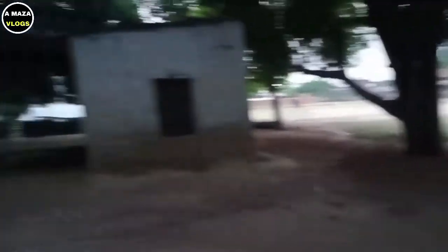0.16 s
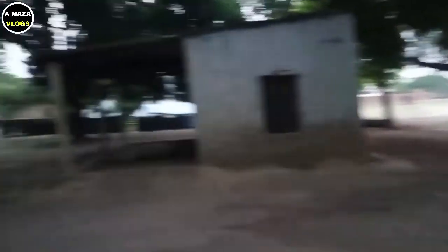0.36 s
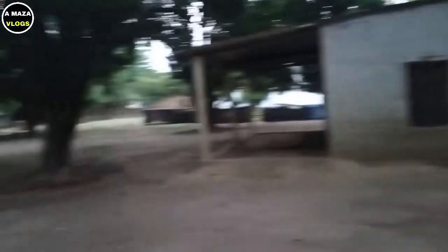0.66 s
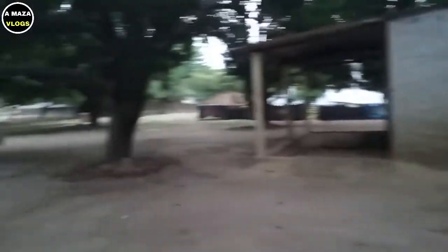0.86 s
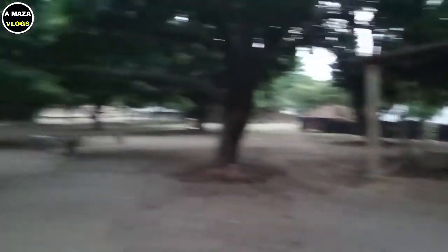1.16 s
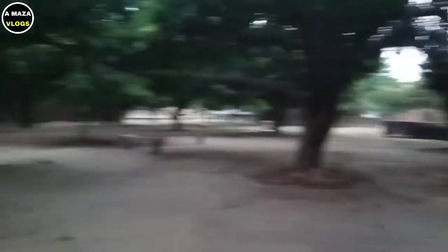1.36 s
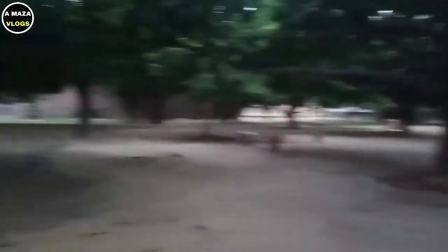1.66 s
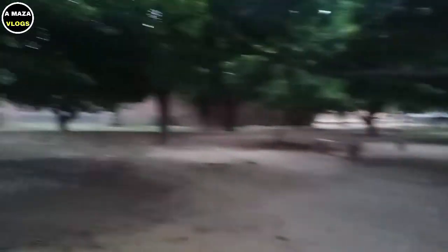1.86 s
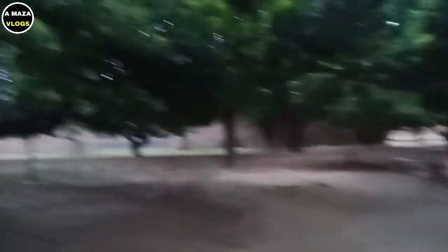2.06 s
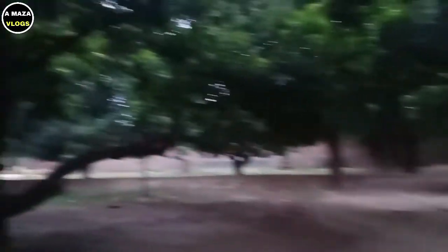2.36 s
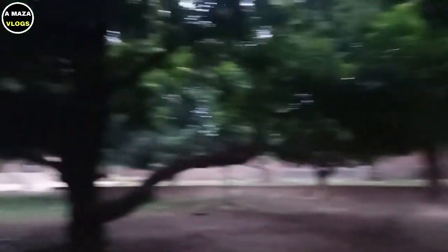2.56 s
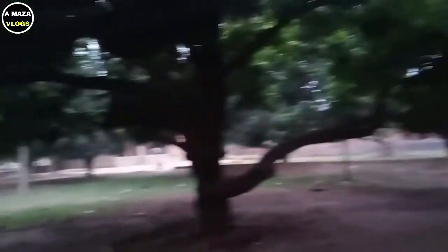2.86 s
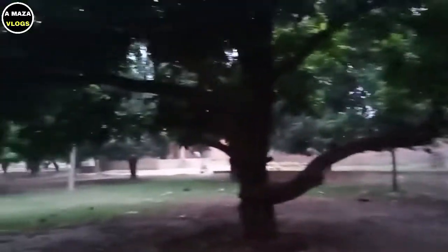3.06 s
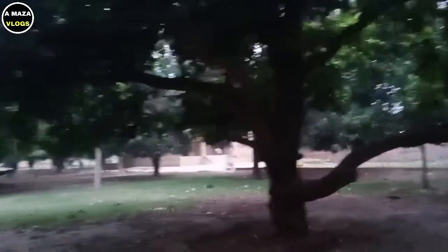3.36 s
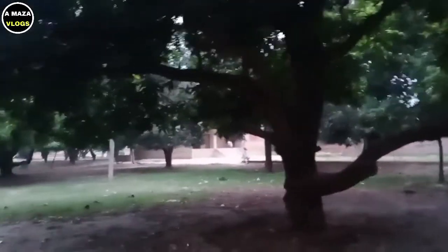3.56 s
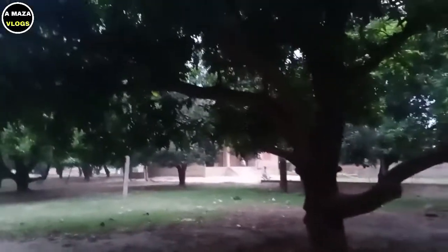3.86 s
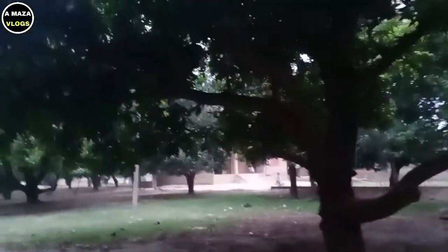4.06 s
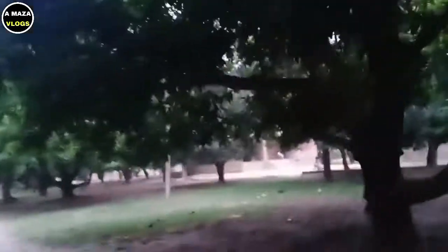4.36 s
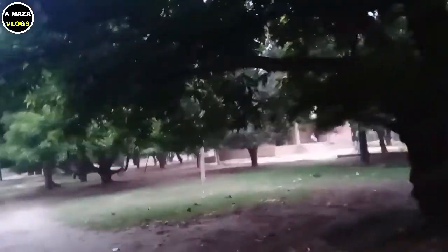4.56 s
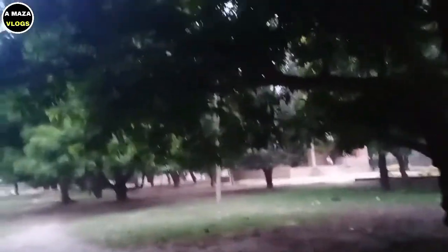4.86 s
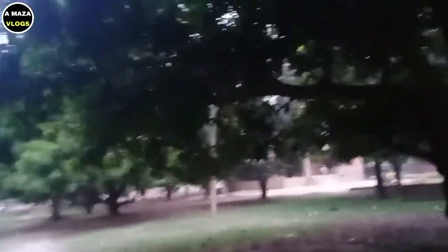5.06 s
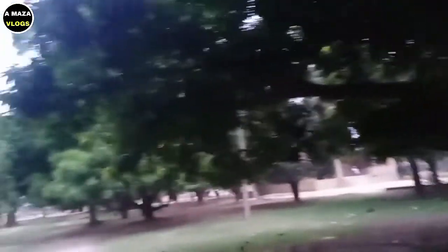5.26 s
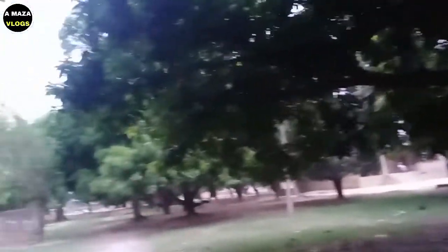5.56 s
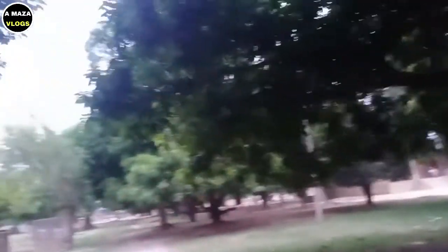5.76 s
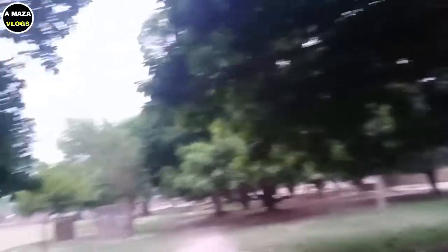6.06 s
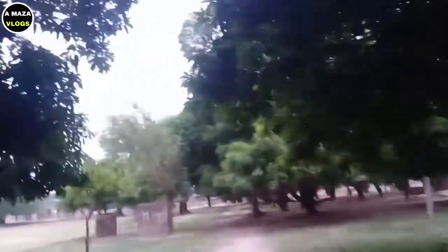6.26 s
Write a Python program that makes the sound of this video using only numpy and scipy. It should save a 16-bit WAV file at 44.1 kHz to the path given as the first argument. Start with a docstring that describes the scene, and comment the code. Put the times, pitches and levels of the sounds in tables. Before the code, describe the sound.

Cicadas keep up a high, steady drone in an orchard. One close by swells into a throbbing buzz, then slowly fades. A songbird repeats a falling note among small chirps and tiny pips, and distant calls blur into a chorus, lightly echoed by the trees. Someone scuffs over dry ground, with one loud crunch past the middle and a couple of twig snaps. Two swooping whistles come near the end.

```python
"""A steady drone of cicadas fills an orchard at dawn; one close to the microphone swells up in throbbing
syllables and fades. Their buckling ribs click, and their hollow bodies ring. In the trees a songbird
repeats a falling slur among other birds' chirps; nearer by come tiny pips and two swooping whistles,
and far calls blur into a chorus, all echoed by trunks and crowns. Someone walks over dry ground:
a few scuffs of the soles, one loud crunch and two snapping twigs."""
import sys
import numpy as np
from scipy import signal
from scipy.fft import rfft, irfft
from scipy.io import wavfile

SR = 44100
rng = np.random.default_rng(int(sys.argv[2]) if len(sys.argv) > 2 else 0)


def master_out(mix):
    """Clip the mix to full scale and print it as 16-bit PCM to the path in sys.argv[1]."""
    frames = np.transpose(np.atleast_2d(mix))
    ceiling = np.clip(frames, -1, 1)
    pcm = np.round(ceiling * 32767).astype(np.int16)
    wavfile.write(sys.argv[1], SR, pcm)


N = 282681
TIME = np.arange(N) / SR


def close_cicada():
    """Close to the microphone, an abdomen pumps clicks into syllables; overtones sound between beats."""
    # the swell and fade: (time [s], song level [dB], overtone level [dB])
    levels = [(0, -43.5, -60), (1.05, -53.5, -57), (1.35, -40.5, -50.5), (1.75, -36, -39),
              (2.0, -30.5, -41.5), (2.35, -29, -41.5), (2.7, -34, -52.5), (3.2, -37.5, -53),
              (4.3, -43.5, -57), (4.7, -50, -61), (5.35, -43.5, -66), (6.41, -64, -64)]
    # colour of the song: (frequency [Hz], relative level [dB])
    body = [(5600, -49.5), (6250, -11.5), (6700, -15.5), (7300, 5.5), (7500, 2), (7700, -8.5), (8100, -1),
            (8550, -8.5), (9250, -20), (9850, -22.5), (11300, -39.5)]
    # colour of the thin hiss above it: (frequency [Hz], relative level [dB])
    overtones = [(10000, -60), (11400, 3.5), (12200, -29), (13400, 8), (15300, 11)]
    song_db, hiss_db = in_time(levels)
    syllable_hz = 26.8
    turns = syllable_hz * TIME + .35
    opening = .36 + ((1 + np.cos(2 * np.pi * turns)) / 2) ** .38
    clicks = tymbal(click_hz=418, jitter=.03, uneven_db=2.1)
    ringing = shell(coloured(clicks * opening, body))
    song = rms_one(orchard(ringing, wet_db=-8, t60=.17))
    # lower and upper overtones peak at different moments of the syllable
    rasp = coloured(clicks + .92 * rng.standard_normal(N), overtones)
    low = band(rasp, 12600, spread=1.06) * from_db(3 + 6 * np.cos(2 * np.pi * (turns - .5)))
    high = rasp * from_db(2.2 * np.cos(2 * np.pi * (turns - .72)))
    return from_db(song_db) * song + from_db(hiss_db) * rms_one(low + high)


def cicada_drone():
    """Three cicadas further off, each at its own click rate and smeared by the trees on its own path."""
    # colour of the drone: (frequency [Hz], relative level [dB])
    colour = [(5200, -42.5), (5750, -26), (6000, -11.5), (6300, -14), (6850, 1), (7100, 1.5), (7350, -2),
              (7700, -1), (8250, -6), (8550, -9.5), (9300, -23), (11400, -38), (12500, -45), (15300, -53)]
    voices = [tymbal(click_hz=385, jitter=.13, uneven_db=2.5),
              from_db(-2.5) * tymbal(click_hz=440, jitter=.15, uneven_db=1.3),
              from_db(-3) * tymbal(click_hz=310, jitter=.18, uneven_db=.82)]
    blurred = sum(orchard(clicks, wet_db=0, t60=.08) for clicks in voices)
    return from_db(-38) * rms_one(shell(coloured(blurred, colour)))


def tymbal(click_hz, jitter, uneven_db):
    """A cicada's ribs buckle in a fast, slightly uneven train of clicks."""
    turns = np.cumsum(click_hz * (1 + jitter * drift(250))) / SR
    clicks = np.diff(np.floor(turns), prepend=0)
    return rms_one(clicks * from_db(uneven_db * rng.standard_normal(N)))


def shell(x):
    """A cicada's hollow body rings on at a few pitches."""
    # sharp resonances: (frequency [Hz], width [Hz], gain [dB])
    modes = [(6550, 140, -14), (7780, 51, 7.5), (8850, 95, -22)]
    return x + sum(from_db(db) * signal.lfilter(*signal.iirpeak(hz, hz / width, fs=SR), x)
                   for hz, width, db in modes)


def footsteps():
    """Soles scuff dry ground and each crack is a burst of tiny fractures; thin twigs also spit treble."""
    # soles rubbing: (time [s], length [s], level [dB], centre [Hz], band edge over centre [ratio])
    scuffs = [(.74, 0.1, -50.5, 3500, 1.25), (1.213, 0.043, -35.5, 3510, 1.21),
              (1.79, 0.14, -53.5, 4470, 1.25), (2.15, 0.052, -42.5, 3350, 1.34),
              (2.99, 0.22, -47, 3700, 1.7), (3.874, 0.13, -31.5, 1790, 2), (3.982, 0.07, -30, 2000, 1.9),
              (4.22, 0.16, -49, 1810, 1.95), (5.05, 0.16, -50.5, 2480, 1.5), (6.357, .028, -33, 4630, 1.7)]
    # twigs and clods breaking underfoot: (time [s], level [dB], centre [Hz])
    cracks = [(2.1939, -27, 2360), (3.878, -15.5, 1470), (3.896, -16.5, 1250), (3.918, -14.5, 1780),
              (3.9215, -8.5, 2100), (3.93, -17, 2670), (3.9368, -11.5, 2300), (3.948, -15, 2700),
              (3.995, -23, 1600), (4.0148, -13.5, 3840), (4.039, -12, 2720), (4.301, -30, 3700),
              (4.3264, -18.5, 2430), (5.04, -26, 2420), (5.0515, -12.5, 2380), (6.363, -30, 4900),
              (6.373, -19, 4640)]
    # colour the ground gives to both: (frequency [Hz], relative level [dB])
    ground = [(200, -17), (400, 2.5), (600, -7), (850, -4), (1500, 1), (3300, -4), (5200, 2), (7000, -7.5),
              (10500, -4), (14500, 6.5)]
    steps = rubbing(scuffs, grain_db=1, clump_db=3.5, sheen_db=-10.5)
    t, decay_s = TIME[:SR // 10], .0016
    for s, db, hz in cracks:
        fractures = rng.standard_normal(len(t)) * np.exp(-t / decay_s)
        treble_gain = from_db(-21.5) * (hz / 3000) ** 2
        crack = band(fractures, hz, spread=1.55) + treble_gain * band(fractures, 13300, spread=1.43)
        add(steps, s, from_db(db) * crack / np.abs(crack).max())
    return from_db(.5) * orchard(coloured(steps, ground), wet_db=-7, t60=.37)


def rubbing(rows, grain_db, clump_db, sheen_db):
    """Grit gives way in grains and clumps, swelling quickly and dying away; dust adds a high sheen."""
    out = np.zeros(N)
    grains = rng.standard_normal(N) * from_db(grain_db * drift(700) + clump_db * drift(90))
    sheen = from_db(sheen_db) * band(grains, 13800, spread=1.16)
    for s, length, db, hz, spread in rows:
        span = slice(int(s * SR), int(s * SR) + int(length * SR))
        rub = rms_one(band(grains[span], hz, spread)) + sheen[span]
        swell = np.sin(np.pi * np.linspace(0, 1, len(rub)) ** .63)
        add(out, s, from_db(db) * rms_one(rub * swell))
    return out


def near_birds():
    """The birds nearest the microphone give tiny rising pips and two steeply falling whistles."""
    # falling whistles: (time [s], level [dB])
    swoops = [(5.67, -37.5), (5.921, -46)]
    # pips: (time [s], start pitch [Hz], level [dB])
    pips = [(.575, 2707, -35), (.921, 3190, -36), (1.118, 3220, -43), (3.31, 2380, -35)]
    notes = [note(s, db, hz=6120, length=.175, glide=-1.38, arch=.0195) for s, db in swoops]
    notes += [note(s, db, hz, length=.03, glide=.11) for s, hz, db in pips]
    return orchard(hoarse(notes, waver=.0116, rasp_db=-6), wet_db=.38, t60=.53)


def tree_birds():
    """Deeper in the trees, heard mostly as echo, a songbird repeats a falling slur and others chirp."""
    # the songbird: (time [s], length [s], start pitch [Hz], level [dB])
    slurs = [(0.161, 0.22, 4390, -49), (0.365, 0.13, 3367, -49.5), (1.008, 0.1, 4240, -52.5),
             (1.791, 0.13, 4355, -47.5), (1.954, .35, 4076, -44.5), (2.375, 0.25, 3950, -43.5),
             (2.68, 0.3, 4190, -43.5), (3.077, 0.22, 3770, -45), (3.405, .16, 3840, -48),
             (3.724, 0.17, 4255, -43), (4.206, 0.21, 3917, -44), (4.719, 0.13, 4130, -46),
             (4.972, 0.17, 3920, -47.5)]
    # other small birds: (time [s], length [s], start pitch [Hz], glide [octaves], level [dB])
    chirps = [(0, 0.056, 3770, -0.11, -48.5), (.78, 0.15, 4180, 0.26, -55), (1.24, .12, 4020, -0.49, -45),
              (1.375, 0.082, 3430, 0.18, -41.5), (1.609, 0.2, 2580, 0.33, -51),
              (1.72, 0.088, 2673, -.42, -53), (3.535, 0.096, 3460, .02, -47),
              (3.666, 0.058, 2880, -0.034, -50), (4.162, 0.078, 1920, 0.33, -42),
              (4.603, 0.17, 3940, 0.03, -45.5), (4.701, 0.178, 2894, -0.22, -56.5),
              (6.29, 0.066, 3150, 0.025, -50.5)]
    notes = [note(s, db, hz, length, glide=-.24, arch=-.0158) for s, length, hz, db in slurs]
    notes += [note(s, db, hz, length, glide) for s, length, hz, glide, db in chirps]
    return orchard(hoarse(notes, waver=.0254, rasp_db=-5), wet_db=7.3, t60=.53)


def far_birds():
    """Long, nearly level calls and short sinking hoots carry from far away."""
    # rooster-like calls: (time [s], length [s], pitch [Hz], level [dB])
    crows = [(.68, 0.44, 779, -68), (1.0, 0.18, 1246, -59.5), (1.92, 0.108, 661, -55),
             (2.094, .58, 642, -58.5), (2.04, 0.22, 1409, -55), (2.52, 0.47, 1356, -53.5),
             (2.88, 0.67, 686, -60.5), (3.12, 0.382, 1069, -51), (3.48, 0.38, 1189, -48.5),
             (3.69, 0.21, 731, -54)]
    # hoots: (time [s], start pitch [Hz], level [dB])
    hoots = [(.06, 1085, -60.5), (.06, 623, -62.5), (0.532, 1600, -60), (0.699, 1987, -51.5),
             (1.02, 596, -64), (1.568, 1130, -58), (4.07, 1188, -48.5), (4.529, 1588, -53.5),
             (4.94, 1288, -46.5), (5.081, 1015, -52), (5.178, 1600, -47.5), (5.34, 1402, -48.5),
             (5.48, 442, -67), (5.519, 1750, -52.5), (5.619, 336.4, -61), (5.819, 1202, -56.5),
             (5.941, 1647, -47), (6.221, 1522, -59)]
    crow_notes = [note(s, db, hz, length, arch=.02517) for s, length, hz, db in crows]
    hoot_notes = [note(s, db, hz, length=.0823, glide=-.0586) for s, hz, db in hoots]
    crowing = whistles(crow_notes, waver=.065, waver_rate=90)
    hooting = whistles(hoot_notes, waver=.0438, waver_rate=180)
    return orchard(crowing + hooting, wet_db=4.5, t60=.51)


def note(s, db, hz, length, glide=0, arch=0):
    """A call at time s: from hz it glides over its length [s] and arches midway, both in octaves."""
    return s, db, hz, length, glide, arch


def whistles(notes, waver, waver_rate):
    """Near-pure bird notes whose pitch wavers by a share of itself."""
    attack_s, release_s = .027, .032
    out = np.zeros(N)
    wobble = 1 + waver * drift(waver_rate)
    for s, db, start_hz, length, glide, arch in notes:
        t = TIME[:int(length * SR)]
        progress = t / length
        octaves = glide * progress + arch * (1 - (2 * progress - 1) ** 2)
        hz = start_hz * 2 ** octaves * np.roll(wobble, -int(s * SR))[:len(t)]
        envelope = np.minimum(1, np.minimum(t / attack_s, (length - t) / release_s))
        tone = np.sqrt(2) * np.sin(2 * np.pi * np.cumsum(hz) / SR)
        add(out, s, from_db(db) * envelope * tone)
    return out


def hoarse(notes, waver, rasp_db):
    """A clear whistle with a rough edge of fast pitch flutter; the power is kept."""
    clear = whistles(notes, waver, waver_rate=150)
    rough = whistles(notes, waver=.0425, waver_rate=650)
    rasp = from_db(rasp_db)
    return (clear + rasp * rough) / np.hypot(1, rasp)


def chorus():
    """Hundreds of far calls merge into a murmur; some closer chirps stand out of it."""
    # rise and fall of the chorus: (time [s], murmur level [dB], chirp level [dB])
    levels = [(0, -63.5, -67), (1.5, -69.5, -66.5), (2.6, -62, -83), (3.05, -45.5, -86), (3.6, -54.5, -55),
              (4.2, -54.5, -52), (5.0, -54.5, -56), (5.7, -59.5, -61), (6.41, -74, -55)]
    # colour of the murmur: (frequency [Hz], relative level [dB])
    colour = [(470, -81.5), (800, -20), (1430, -4.5), (1580, -10), (1840, -11.5), (1990, -14.5),
              (2880, -32), (3760, 7), (4320, -3), (5500, -25), (7150, -37), (12100, -120)]
    murmur_db, chirps_db = in_time(levels)
    crowd = whistles(random_calls(count=400, low_hz=1100, high_hz=3400), waver=.03, waver_rate=150)
    murmur = coloured(orchard(crowd, wet_db=8, t60=.7), colour)
    closer = whistles(random_calls(count=150, low_hz=1300, high_hz=3100), waver=.025, waver_rate=200)
    chirps = orchard(closer, wet_db=4, t60=.35)
    return from_db(murmur_db) * rms_one(murmur) + from_db(chirps_db) * rms_one(chirps)


def random_calls(count, low_hz, high_hz):
    """Short gliding notes at chance times, pitches and distances."""
    placings, shapes = rng.random((count, 3)), rng.uniform(-1, 1, (count, 3))
    return [note(when * N / SR, db=2 * loud, hz=low_hz * (high_hz / low_hz) ** pitch,
                 length=.0444 + .0917 * held, glide=.228 * slope, arch=.1226 * bend)
            for (when, held, pitch), (bend, slope, loud) in zip(placings, shapes)]


def rumbles():
    """Three soft, low rumbles swell and die away."""
    # low swells: (time [s], length [s], level [dB], centre [Hz], band edge over centre [ratio])
    bumps = [(2.49, 0.12, -69, 89, 1.3), (4.58, 0.21, -71, 150, 1.07), (6.17, .19, -64, 74.6, 1.19)]
    return band(rubbing(bumps, grain_db=0, clump_db=0, sheen_db=-80), 150, spread=3.5)


def still_air():
    """A faint, even hush lies behind everything."""
    # colour of the air: (frequency [Hz], relative level [dB])
    colour = [(25, -4), (50, -14.5), (85, 3), (120, -2), (170, -0.5), (280, -8.5), (600, -10), (900, -10),
              (1400, -14), (2500, -5.5), (5000, -14), (11000, -17.5), (15000, -12)]
    return from_db(-64.5) * coloured(rng.standard_normal(N), colour)


def orchard(x, wet_db, t60):
    """Direct sound plus clumped echoes from trunks and crowns, 60 dB down in t60 s; the power is kept."""
    t, onset_s = TIME[:SR], .00033
    clumps = from_db(3 * drift(200)[:SR])
    envelope = from_db(-60 * t / t60) * (1 - np.exp(-t / onset_s))
    response = rng.standard_normal(SR) * clumps * envelope
    echoes = signal.fftconvolve(x, response / np.linalg.norm(response))[:N]
    wet = from_db(wet_db)
    return (x + wet * echoes) / np.hypot(1, wet)


def coloured(x, spectrum):
    """Causal (minimum-phase) filter with the given spectrum and unit power gain."""
    hz, db = np.transpose(spectrum)
    size = 4096
    bin_hz = np.arange(size // 2 + 1) * SR / size
    log_gain = np.log(from_db(np.interp(np.log(bin_hz + 1), np.log(hz), db)))
    cepstrum = irfft(log_gain)[:size // 2]
    causal = np.r_[cepstrum[0], 2 * cepstrum[1:]]
    response = irfft(np.exp(rfft(causal, size)))
    return signal.fftconvolve(x, response / np.linalg.norm(response))[:N]


def band(x, hz, spread):
    """A band-pass from hz / spread to hz * spread."""
    edges = [hz / spread, min(hz * spread, .45 * SR)]
    return signal.sosfilt(signal.butter(2, edges, "band", fs=SR, output="sos"), x)


def drift(rate):
    """A random wander of unit rms that turns rate times a second."""
    knots = rng.standard_normal(N // 10)
    return rms_one(np.interp(TIME * rate, np.arange(len(knots)), knots))


def from_db(db):
    """Decibels to gain."""
    return 10 ** (np.asarray(db) / 20)


def rms_one(x):
    """Scale to unit rms."""
    return x / np.sqrt(np.mean(x ** 2) + 1e-20)


def in_time(rows):
    """Each column of a curve at every sample."""
    s, *columns = np.transpose(rows)
    return [np.interp(TIME, s, column) for column in columns]


def add(out, s, sound):
    """Mix a sound in at time s."""
    at = int(np.clip(round(s * SR), 0, N - 1))
    out[at:at + len(sound)] += sound[:N - at]


def scene():
    """Cicadas, birds and a walker over a bed of still air, at one microphone among the trees."""
    bed = still_air() + rumbles()
    cicadas = cicada_drone() + close_cicada()
    birds = near_birds() + tree_birds() + far_birds() + chorus()
    return (cicadas + birds + footsteps() + bed)[None]


def record(dry):
    """The highest treble is cut steeply."""
    cutoff_hz = 15550
    return signal.sosfilt(signal.ellip(12, .2, 80, cutoff_hz, fs=SR, output="sos"), dry)


dry = scene()
out = record(dry)
master_out(out)
```